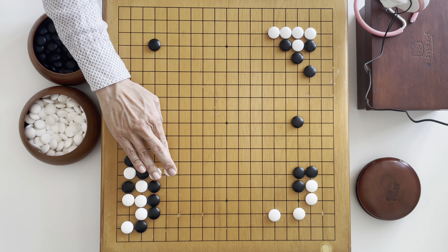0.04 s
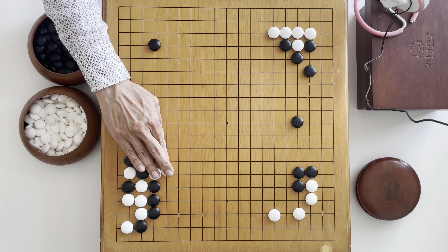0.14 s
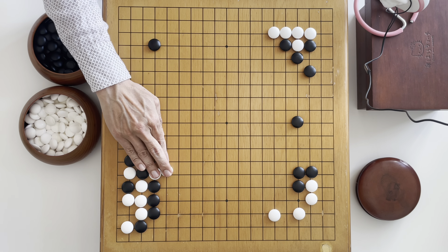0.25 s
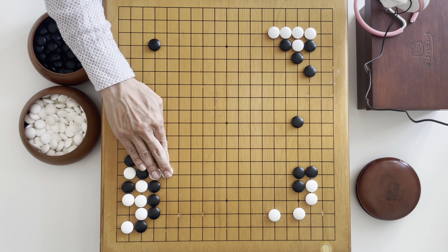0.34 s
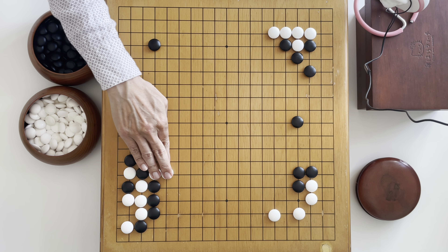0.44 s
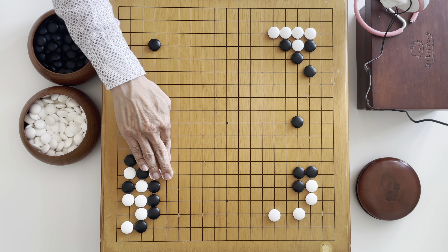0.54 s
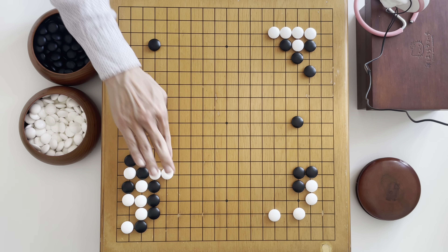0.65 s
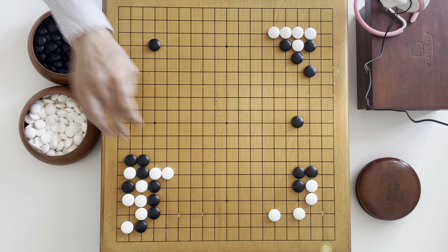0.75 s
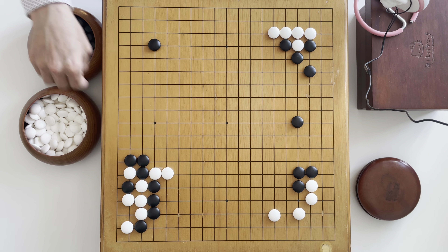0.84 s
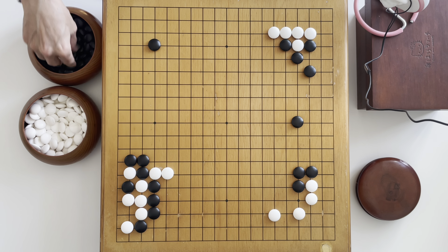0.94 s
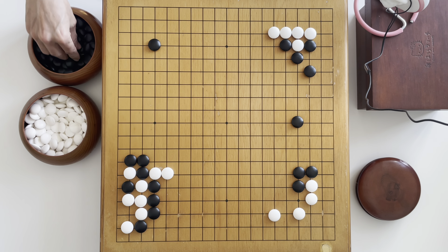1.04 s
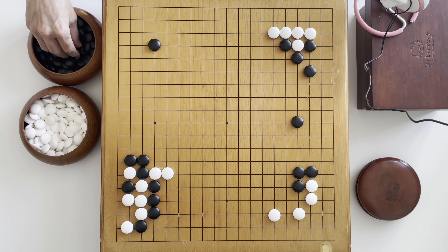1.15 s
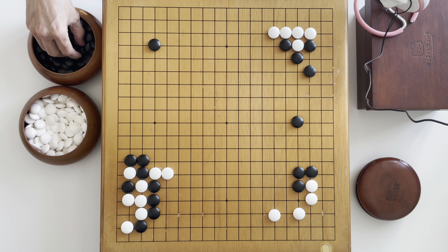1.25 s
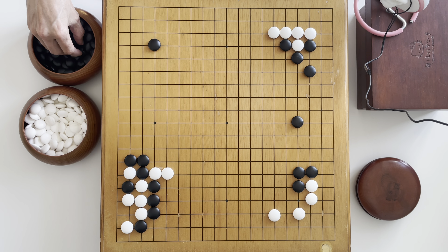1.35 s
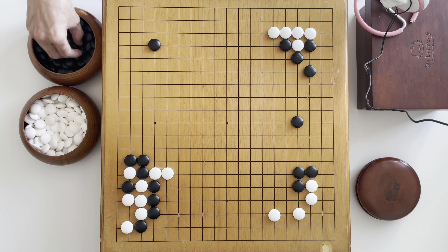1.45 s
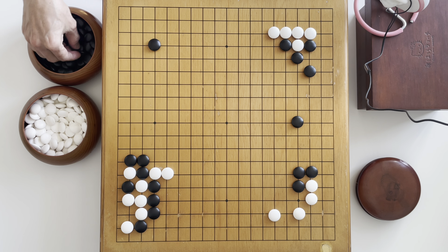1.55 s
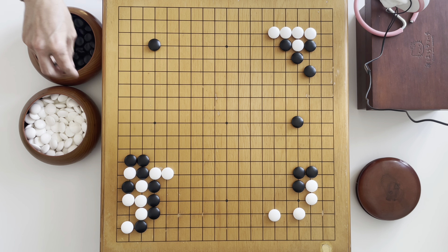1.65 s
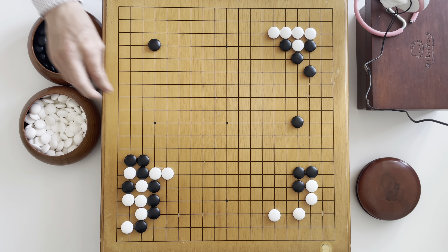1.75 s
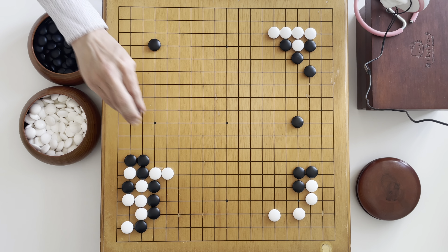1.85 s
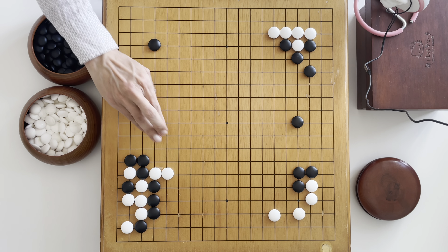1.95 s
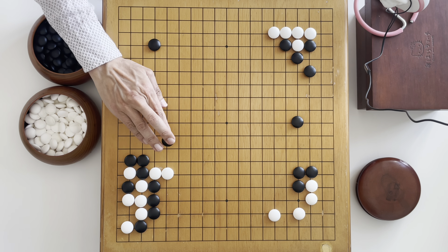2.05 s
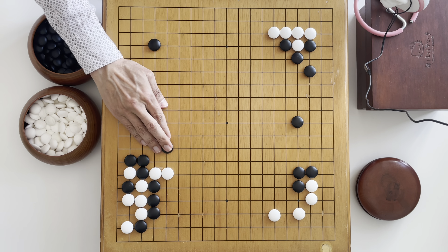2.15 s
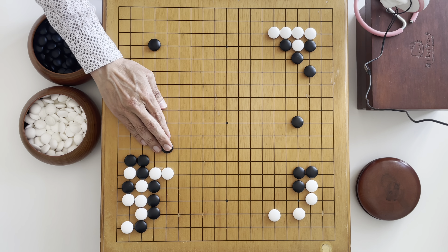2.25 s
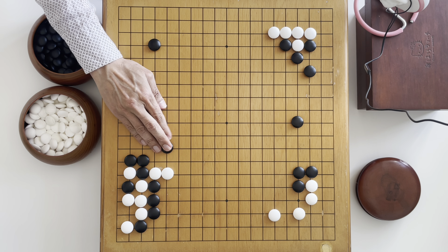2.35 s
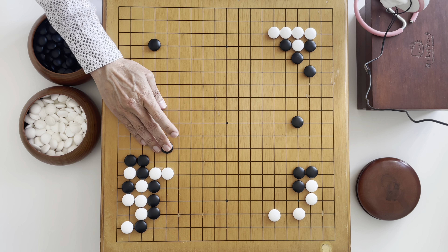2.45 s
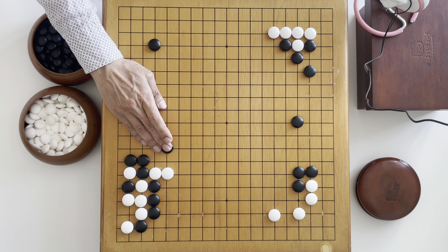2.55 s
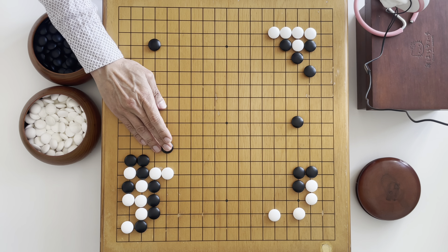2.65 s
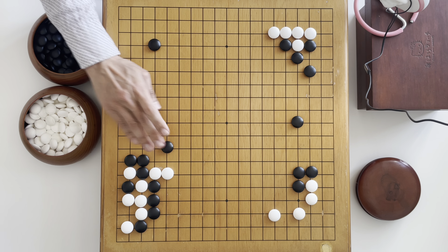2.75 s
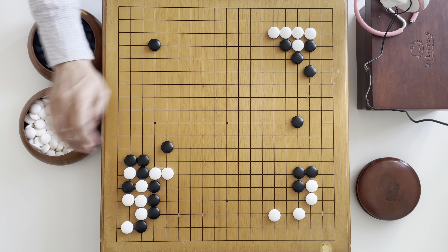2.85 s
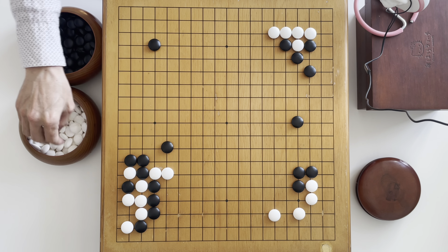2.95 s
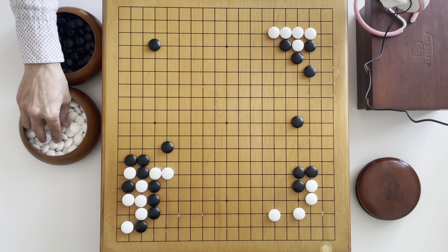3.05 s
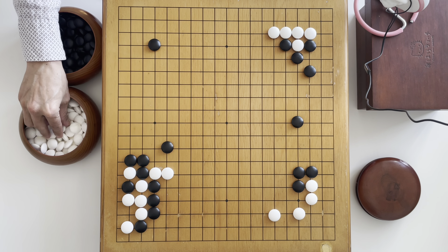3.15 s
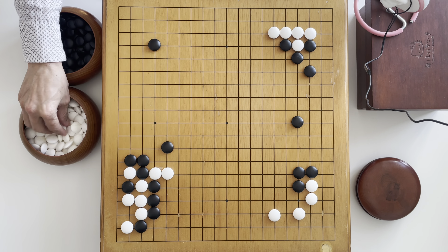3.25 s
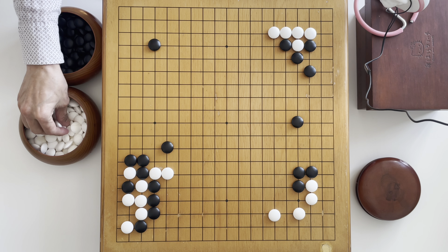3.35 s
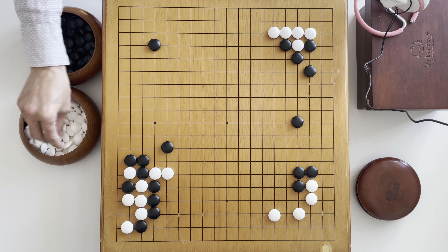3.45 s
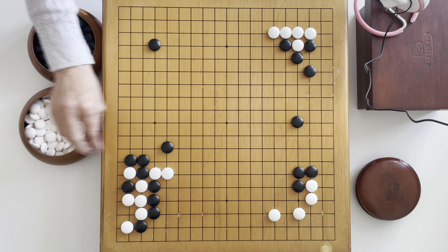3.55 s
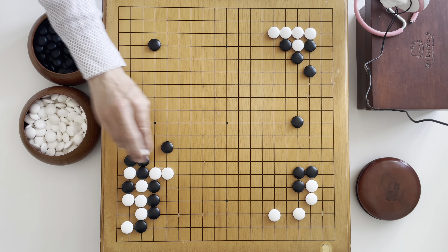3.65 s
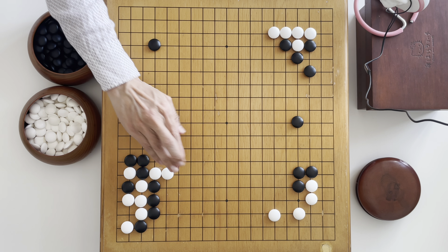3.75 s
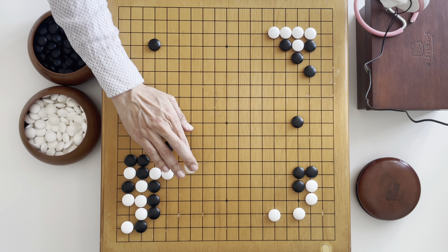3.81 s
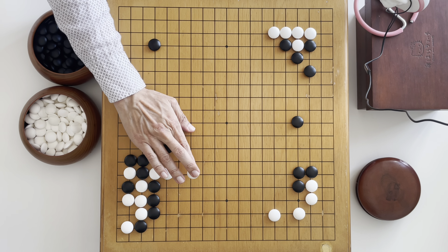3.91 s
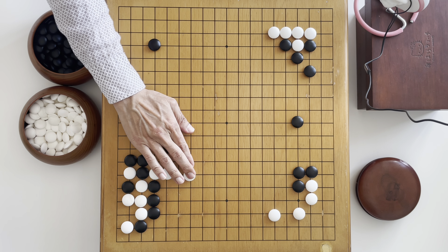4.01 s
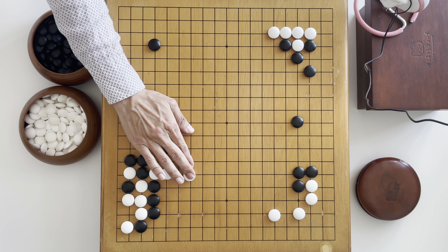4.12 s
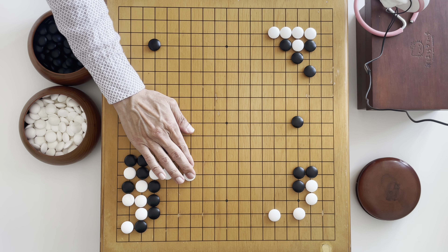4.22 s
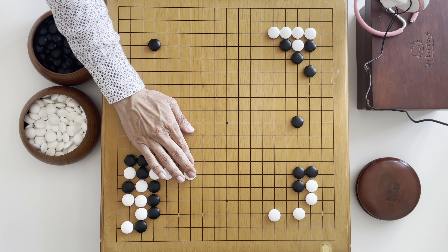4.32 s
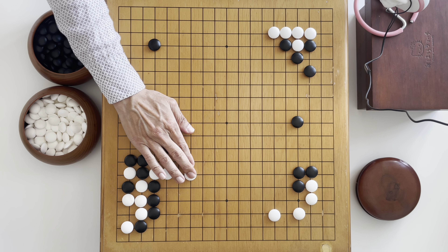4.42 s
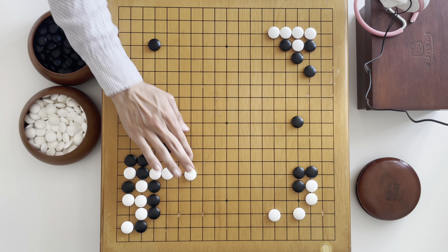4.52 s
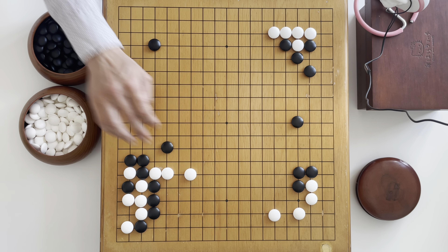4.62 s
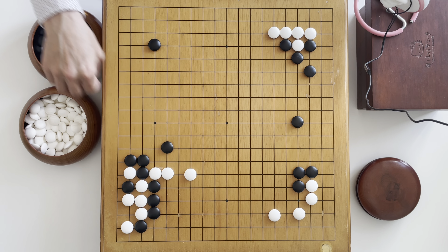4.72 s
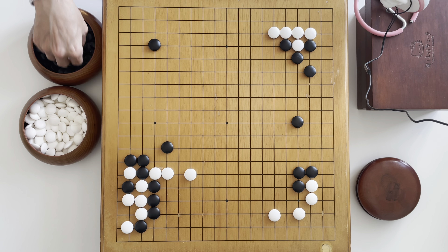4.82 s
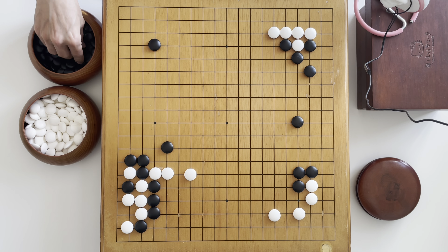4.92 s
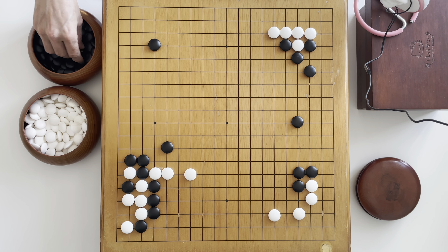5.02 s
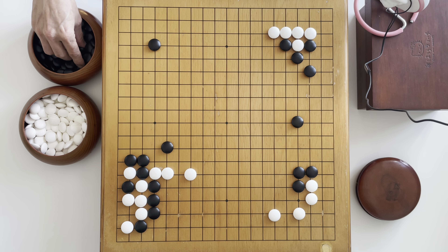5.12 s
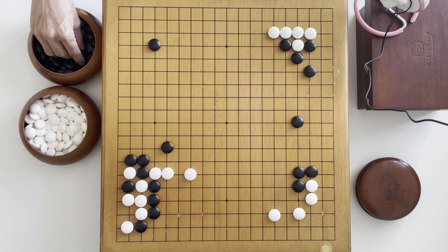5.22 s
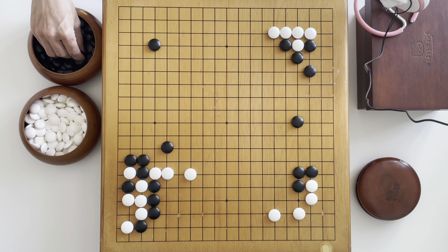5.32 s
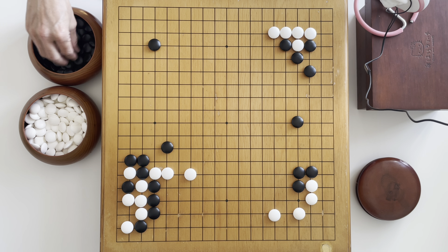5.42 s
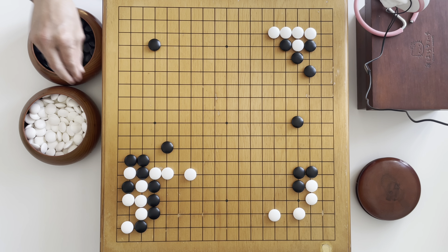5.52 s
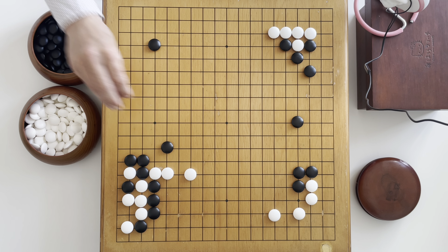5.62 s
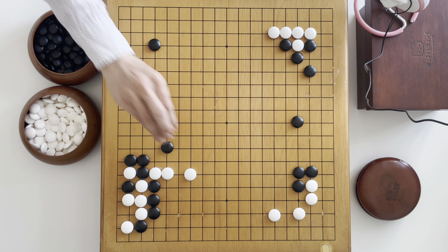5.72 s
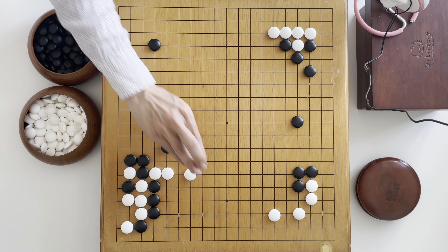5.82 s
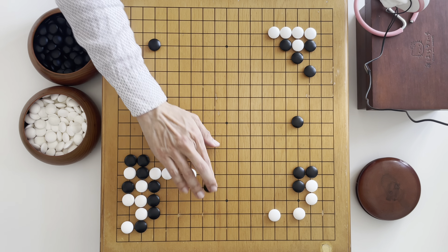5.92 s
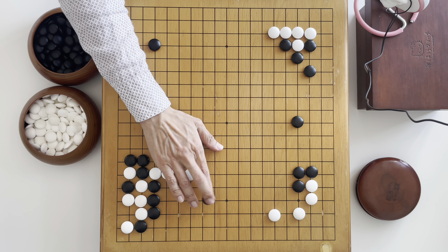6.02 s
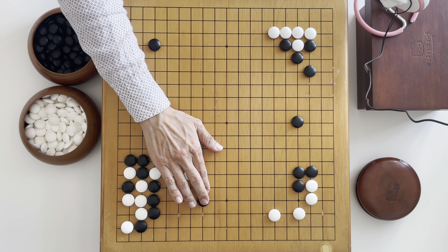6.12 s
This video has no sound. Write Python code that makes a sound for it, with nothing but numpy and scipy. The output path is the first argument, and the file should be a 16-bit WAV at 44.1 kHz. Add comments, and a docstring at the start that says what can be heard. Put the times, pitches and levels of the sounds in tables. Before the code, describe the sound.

In a small quiet room, a few faint taps lead into a clinking rummage through a wooden bowl of stones. A stone cracks down on a wooden board with a hollow knock. Two more rounds of rattling and placing follow, the last clack coming right at the end. Spaced stereo microphones catch it slightly to the left, over a faint hum, hiss and deep rumble.

```python
"""A small room, a thick wooden board, a spaced microphone pair with the left one nearer to the board.
Fingers stir hard stones in wooden bowls, where they rattle and click against each other and the wood.
Stones are picked out and set down with a clack: the contact cracks, the board rings, knocks and thuds.
The room rings briefly after each sound. Faint hum, hiss and a deep wavering rumble fill the quiet."""
import sys
import numpy as np
from scipy import signal
from scipy.fft import rfft, irfft
from scipy.io import wavfile
from scipy.ndimage import uniform_filter1d

SR = 44100
rng = np.random.default_rng(int(sys.argv[2]) if len(sys.argv) > 2 else 0)


def to_wav(s):
    """Save 16-bit WAV."""
    ch = np.atleast_2d(s).T  # columns
    pcm = np.round(np.clip(ch, -1, 1) * 32767)  # PCM
    wavfile.write(sys.argv[1], SR, pcm.astype(np.int16))


N = 272097

# Stones striking the board: t/s, crack level/dB; spit, ring, knock and thud, each level/dB re the crack;
# hardness/(dB per octave), favoured ring f/Hz, its lift/dB, lift of middle knock modes/dB, left-right/dB
BOARD_BLOWS = [(0.1101, -36.5, -29, -7, -9, -4.5, -2, 1280, 1.6, 4, 6.5),
               (0.6121, -52.5, -3, -0.9, -14, -19.5, 14, 695, 17, 0.1, 3),
               (2.0862, -8.5, -5, -9, -11.5, -12, 3.4, 1290, 5.3, -7.5, 8.9),
               (3.9454, -10, -39, -10.5, -12, -16, 4.6, 1185, 7.8, 5.3, 7.5),
               (5.9917, -9.5, -34, -10.5, -8, -12.5, 1.8, 2600, 2.8, 2.5, 4.3)]
# Spectrum of one stone's tick: f/Hz, level/dB
STONE_SPECTRUM = [(60, -35), (130, -1.5), (250, -6), (400, 0), (700, 4), (1250, 4.5), (2200, 1.5),
                  (3200, -1.5), (5500, -2), (9000, -8.5), (15000, -20), (16500, -30)]


def gain_of(db):
    return 10 ** (np.asarray(db) / 20)


def unit_rms(x):
    return x / np.sqrt(np.mean(x ** 2) + 1e-20)


def curve_at(points, hz):
    """Reads a curve along a logarithmic frequency axis."""
    f, value = np.transpose(points)
    return np.interp(np.log(hz + 1), np.log(f + 1), value)


def add(mix, s, sound, pan_db, lead_s=.0003, send_db=0.):
    """Mixes into left, right and room-send rows; the right channel gets it lead_s later."""
    rows = np.broadcast_to(sound, (3, sound.shape[-1]))
    for row, x, at, db in zip(mix, rows, (s, s + lead_s, s), (pan_db / 2, -pan_db / 2, send_db)):
        part = row[round(at * SR):][:len(x)]
        part += gain_of(db) * x[:len(part)]


def diffuse_noise(size):
    """Noise from all sides at the spaced pair: mostly alike in the bass, unrelated in the treble."""
    # Likeness of the two microphones: f/Hz, coherence
    coherence = [(10, 0.89), (30, 0.16), (60, 1), (125, 0.84), (290, 0.89), (640, 0.49), (1400, 0.0097),
                 (16000, .02)]
    a, b = rfft(rng.standard_normal((2, size)))
    same = np.clip(curve_at(coherence, np.fft.rfftfreq(size, 1 / SR)), -1, 1)
    return irfft(np.array([a, same * a + np.sqrt(1 - same ** 2) * b]), size)


def noise_bed(spectrum):
    """Diffuse noise of the given colour, at unit RMS."""
    gain = gain_of(curve_at(spectrum, np.fft.rfftfreq(N, 1 / SR)))
    return unit_rms(irfft(rfft(diffuse_noise(N)) * gain, N))


def air():
    """Room tone: a steady hiss and wash, swelling a little."""
    # Colour of the room tone: f/Hz, level/dB
    spectrum = [(18, -40), (30, -18), (45, -12.5), (76, -20.5), (190, -30), (260, -24.5), (330, -34),
                (440, -27.5), (560, -35.5), (850, -32), (1400, -40), (2500, -43.5), (3000, -50.5),
                (4200, -53), (7000, -59.5), (15000, -62.5), (16500, -82.5)]
    swell = unit_rms(uniform_filter1d(rng.standard_normal(N), 6000))
    return gain_of(-51 + 0.2 * swell) * noise_bed(spectrum)


def hum():
    """Tones that wander a little in pitch and level, as from a fan or a small motor."""
    # Hum tones: f/Hz, wander/Hz, level/dB, phase at the right microphone/turns
    tones = [(124, 3, -63, .03), (257, 5, -58, .04), (1183, 3, -74.5, .08), (2428, 4, -72, .1),
             (2608, 5, -81, .1)]
    out = np.zeros((2, N))
    for hz, wander_hz, db, phase in tones:
        drift, throb = (unit_rms(uniform_filter1d(v, 1500)) for v in rng.standard_normal((2, N)))
        turns = np.cumsum(hz + wander_hz * drift) / SR + np.array([[0], [phase]])
        out += gain_of(db + 1.5 * throb) * np.sqrt(2) * np.sin(2 * np.pi * turns)
    return out


def rumble(flutter_db=-53.5, calm_db=-34., follow=.3, shake_db=-15, shake_t60=.5):
    """A slow waver below hearing and a low flutter that follows it and jumps after each blow."""
    # Course of the waver: t/s, level/dB
    waver_levels = [(0.0, -38), (1.15, -31.5), (2.05, -33.5), (2.3, -29), (2.7, -18), (3.05, -26.5),
                    (3.3, -32.5), (4.1, -33), (5.1, -35), (6.17, -35)]
    # Colour of the waver: f/Hz, level/dB
    waver_spectrum = [(1, 5.5), (3, 11.5), (6, 5), (12, -7.5), (20, -8.5), (30, -40), (120, -110)]
    # Colour of the flutter: f/Hz, level/dB
    flutter_spectrum = [(10, -50), (20, -6), (28, -2), (45, -10), (70, -11), (140, -46), (400, -100)]
    t = np.arange(N) / SR
    waver_db = np.interp(t, *np.transpose(waver_levels))
    flutter_gain = gain_of(flutter_db + follow * (waver_db - calm_db))
    for s, db, _, _, _, thud_db, *_ in BOARD_BLOWS:
        since = np.maximum(t - s, 0)
        rise = np.minimum(since / 0.011, 1)
        flutter_gain += rise * gain_of(db + thud_db + shake_db - 60 * since / shake_t60)
    waver = gain_of(waver_db) * noise_bed(waver_spectrum)
    flutter = flutter_gain * noise_bed(flutter_spectrum)
    return gain_of([[-1.5], [1.5]]) * (waver + flutter)  # stronger at the right


def room(send, gap_s=0.0005):
    """Echoes off near walls: a dense tail that builds up quickly, each band dying at its own speed."""
    # Reverberation time: f/Hz, t60/s
    decay_times = [(60, 0.4), (200, 0.35), (700, 0.31), (2500, 0.38), (6000, 0.36), (10000, 0.33),
                   (16000, 0.29)]
    # Colour of the echoes: f/Hz, level/dB
    walls = [(60, 2), (200, -6), (500, -4), (3000, 2.5), (8000, 1.5), (11000, 2.5), (16000, -3.5)]
    hz, t, bands = signal.stft(diffuse_noise(SR), SR, nperseg=256)
    decay = gain_of(curve_at(walls, hz)[:, None] - 60 * t / curve_at(decay_times, hz)[:, None])
    tail = signal.istft(bands * decay, SR, nperseg=256)[1]
    tail *= np.clip(np.arange(tail.shape[1]) / SR / gap_s - 1, 0, 1)
    return signal.fftconvolve(send[None], tail / np.linalg.norm(tail[0]), axes=1)[:, :N]


def tick(spectrum, hardness_db, t60, lifts=(), size=2048):
    """A coloured pulse: scattered by nearby wood for the two microphones, plain for the room send."""
    hz = abs(np.fft.fftfreq(size, 1 / SR))
    octaves = np.log2((hz + 100) / 3000)
    lift = sum(db * np.exp(-(np.log2((hz + 1) / at_hz) / width) ** 2) for at_hz, width, db in lifts)
    log_gain = np.log(gain_of(curve_at(spectrum, hz) + hardness_db * octaves + lift))
    pulse = np.fft.ifft(np.exp(np.conj(signal.hilbert(log_gain)))).real  # minimum phase
    scatter = rng.standard_normal(size) * gain_of(-60 * np.arange(size) / SR / t60)
    near = signal.fftconvolve(pulse, scatter)[:size]
    return np.array([x / np.linalg.norm(x) for x in (near, near, pulse)]) * np.sqrt(t60 * SR / np.log(1e6))


def rattle(per_s=400., spread_db=4.5, clink_db=7., dig_s=0.00873, settle_db_per_s=249.5):
    """Stirred stones collide at random, each with its own clink; the rattle rises, holds and settles."""
    # Fingers dig in a bowl, or push a stone along the wood: t/s, hold/s, level/dB, share of hard contacts
    stirs = [(0.101, .01, -52.5, 0.09), (0.22, 0.013, -53.5, 0), (0.898, 0.07, -34, 0.73),
             (1.063, 0.1, -50, 0.27), (1.134, 0.17, -48.5, 0.65), (1.354, 0.065, -45, 0.4),
             (1.453, .13, -48, .6), (1.787, 0.048, -59.5, .1), (2.993, 0.01, -36, 0.06),
             (3.052, .15, -38, 0.78), (3.332, 0.0083, -48, 0.1), (4.17, .10, -65, 0),
             (4.777, 0.046, -35.5, 0.36), (4.897, .09, -49.5, 0.5), (4.981, 0.045, -45.5, 0.3),
             (5.064, 0.13, -49.5, 0.45), (5.205, 0.11, -69, 0.6), (5.308, .02, -49, 0.1),
             (5.397, 0.016, -45, 0.45), (5.792, 0.024, -51, 0)]
    pitches = np.geomspace(2400, 7000, 14)  # Hz, one for each stone
    strength = gain_of(spread_db * np.minimum(rng.exponential(1, N), 4))
    hits = strength * (rng.random(N) < per_s / SR)
    stone = rng.integers(0, len(pitches), N)

    def collisions(hardness_db):
        stream = np.zeros(N)
        for k, hz in enumerate(pitches):
            clink = tick(STONE_SPECTRUM, hardness_db, t60=0.0059, lifts=[(hz, .12, clink_db)], size=1024)
            stream += signal.oaconvolve(hits * (stone == k), clink[0])[:N]
        return unit_rms(stream)

    soft, hard = collisions(-4.), collisions(4.)
    mix = np.zeros((3, N))
    t = np.arange(SR // 2) / SR
    for s, hold_s, db, share in stirs:
        span = slice(round(s * SR), round(s * SR) + len(t))
        contacts = np.sqrt(1 - share) * soft[span] + np.sqrt(share) * hard[span]
        effort = np.minimum(t / dig_s, 1) * gain_of(db - settle_db_per_s * np.maximum(t - hold_s, 0))
        add(mix, s, effort[:len(contacts)] * contacts, pan_db=4.)
    return mix


def clicks():
    """A stone knocks once on stone or wood: a dry broad tick, with body from the wood beneath."""
    # Knocks: t/s, level/dB, band f/Hz, its lift/dB, wood body/dB, hardness/(dB per octave), left-right/dB
    knocks = [(0.165, -42.5, 2860, -3, -6, -3, 4), (0.53, -53.5, 2510, -13, 5, -1.5, 4),
              (0.611, -47, 700, -21, 2, 9, 0), (0.901, -28.5, 3150, -2, 13, 4.5, 0),
              (0.9118, -21.5, 2720, -2, 2.5, 2, 2), (0.9553, -27, 3500, 14, -3, -4.5, -7),
              (1.0842, -35.5, 3440, 2, -12, 1, -3), (1.1405, -24, 4080, 4.5, -7, 0, 7),
              (1.3617, -27, 4200, 11.5, 14, 7, 16.5), (1.4418, -23.5, 4880, 1.5, -1, 0.5, 14.5),
              (1.4648, -24, 3570, 6, 8.5, 3, -1), (1.536, -28, 3260, 8, 3, 3, 7),
              (1.8017, -36.5, 3010, 2, -26.5, -7.5, -4), (3.0008, -27, 3720, 2, 0.5, 1.5, 12),
              (3.045, -25, 3000, -2, -11, 0, 6), (3.0618, -21, 3800, 6, 6.5, 3.5, 6),
              (3.1247, -24.5, 2780, 6.5, 13, 1.5, 12), (3.1665, -34, 2880, -13, 23, -2.5, 9),
              (3.1957, -23.5, 4600, 9, -0.5, 0, 10.5), (3.3378, -31, 2930, 4, 7.5, 2.5, 12),
              (3.5921, -28.5, 4730, 5.5, 9.5, 1.5, 8), (3.886, -41.5, 2590, 2.5, -9.5, -6, -2.5),
              (4.7917, -19.5, 2850, -0.5, -14, -1, -11.5), (4.8086, -24, 3730, 23, -9, 13, 1),
              (5.006, -32, 4830, 8, -21, -4, 1), (5.0401, -20.5, 3090, 9.5, -8, -3, 7),
              (5.081, -26, 2780, 3, -12, -2, 8.5), (5.2039, -31.5, 2730, -3, -4, -0.5, 4),
              (5.256, -36, 2780, -2, -19, -2.5, 12), (5.308, -34.5, 3490, 5, -6, 1.5, 5),
              (5.3924, -27.5, 4180, 4.5, -1.5, 1.5, 8), (5.678, -60.5, 2650, 5, 3, 7, 17),
              (5.801, -35, 2490, 0.5, 2.5, -6, -6)]
    mix = np.zeros((3, N))
    for s, db, hz, lift_db, wood_db, hardness_db, pan_db in knocks:
        click = tick(STONE_SPECTRUM, hardness_db, t60=0.01, lifts=[(hz, .4, lift_db), (650, 1.3, wood_db)])
        add(mix, s, gain_of(db) * click, pan_db)
    return mix


def struck_wood(modes, rise_s, spread_db, near_hz=1000., lift_db=0., octaves=.15):
    """Modes ring as dying sines; the place of the blow decides how much each one gets."""
    t = np.arange(SR // 2) / SR
    hz, db, t60 = np.transpose(modes)[:, :, None]
    place_db = spread_db * rng.standard_normal((len(modes), 1))
    place_db += lift_db * np.exp(-(np.log2(hz / near_hz) / octaves) ** 2)
    sines = np.sin(2 * np.pi * hz * t) * gain_of(db + place_db - 60 * t / t60)
    return sines.sum(0) * (1 - np.exp(-t / rise_s))


def clacks():
    """A stone is set down: a treble spit, the crack of contact, the board's ring, knock and thud."""
    # Very short, bright, dry spit at the start of a blow, like brief overload: f/Hz, level/dB
    spit_spectrum = [(1000, -19), (4000, -22.5), (9000, 3), (16500, -0.5)]
    # Crack of stone on wood: f/Hz, level/dB
    crack_spectrum = [(150, -36), (350, 4.5), (600, 5.5), (900, 8), (1600, 7), (2700, -0.5), (4000, 1),
                      (5500, -4), (7700, -13), (9300, -26), (15000, -36.5), (16500, -46.5)]
    # Upper modes of the board: f/Hz, level/dB, t60/s
    ring_modes = [(700.4, -5, 0.07), (810, 8, 0.028), (948, -4, 0.039), (1185, -13, 0.09),
                  (1294, -2, 0.087), (1411, -7, 0.083), (1700, -9, .05), (2185, -4, 0.074),
                  (2700, -0.5, .055), (2745, -3.5, 0.052), (2930, -11, 0.086), (3480, -10, 0.025),
                  (3760, -8, .035), (4280, -9, 0.035), (4720, -8, 0.054)]
    # Hollow middle modes of the board: f/Hz, level/dB, t60/s
    knock_modes = [(233.2, -7, 0.2), (270, -4, 0.14), (308, -0.5, 0.076), (405, -9.5, 0.1),
                   (437, -12.5, .09)]
    # Low modes of board and table: f/Hz, level/dB, t60/s
    thud_modes = [(71, -2, 0.11), (94.5, 1, 0.18), (126.5, -2, 0.1)]
    mix = np.zeros((3, N))
    for s, db, spit_db, ring_db, knock_db, thud_db, hardness, hz, lift_db, mid_db, pan_db in BOARD_BLOWS:
        spit = tick(spit_spectrum, 0, t60=0.0022)
        crack = tick(crack_spectrum, hardness, t60=0.015)
        ring = struck_wood(ring_modes, 0.0019, spread_db=3.5, near_hz=hz, lift_db=lift_db, octaves=.08)
        knock = struck_wood(knock_modes, 0.0033, spread_db=0.3, near_hz=284.7, lift_db=mid_db, octaves=.2)
        thud = struck_wood(thud_modes, 0.003, spread_db=1.5)
        add(mix, s, gain_of(db + spit_db) * spit, pan_db, send_db=-22.)
        add(mix, s, gain_of(db) * crack, pan_db)
        add(mix, s, gain_of(db + ring_db) * ring, pan_db, send_db=-1.)
        add(mix, s, gain_of(db + knock_db) * knock, pan_db=1.5)
        # the low thud reaches the right microphone slightly later, so it sounds a little wide
        add(mix, s, gain_of(db + thud_db) * thud, pan_db=1.5, lead_s=.0014)
    return mix


def scene():
    """Direct sound at the pair, the room's answer and the background."""
    board, knocks, stir = clacks(), clicks(), rattle()
    direct = (board + knocks + stir)[:2]
    echoes = room(board[2] + gain_of(6.5) * knocks[2] + gain_of(1.) * stir[2])
    return direct + echoes + air() + hum() + rumble()


def record(dry, edge_hz=16480):
    """The recorder clips at full scale, then cuts the top of the treble."""
    lowpass = signal.firwin(511, edge_hz, window=("kaiser", 9), fs=SR)
    return signal.oaconvolve(np.clip(dry, -1, 1), lowpass[None], "same")


dry = scene()
out = record(dry)
to_wav(out)
```